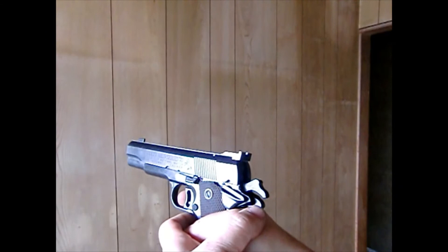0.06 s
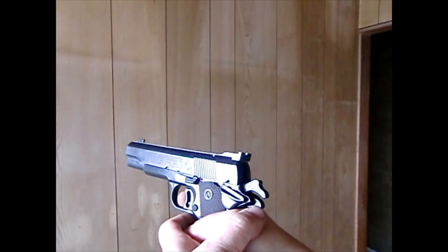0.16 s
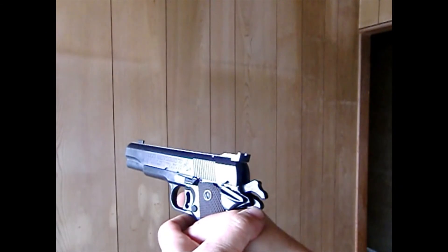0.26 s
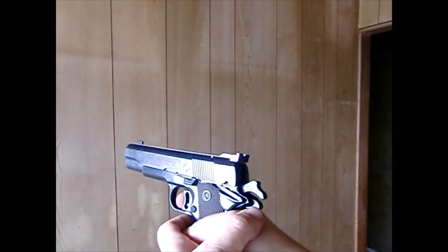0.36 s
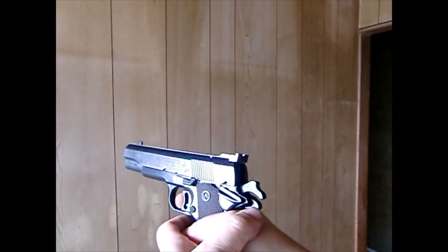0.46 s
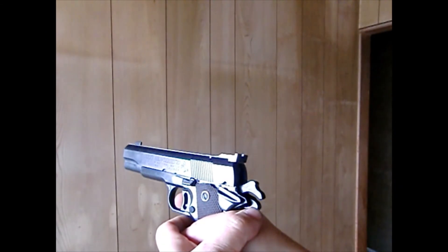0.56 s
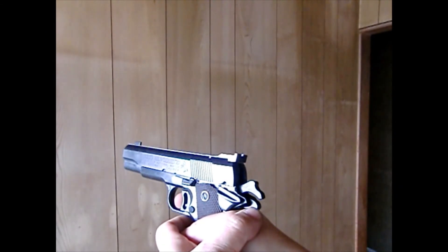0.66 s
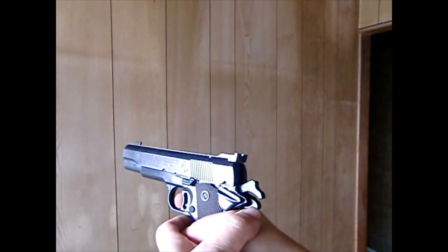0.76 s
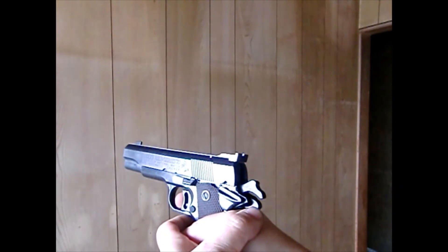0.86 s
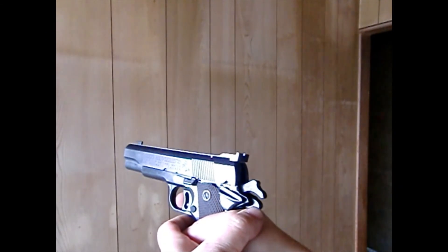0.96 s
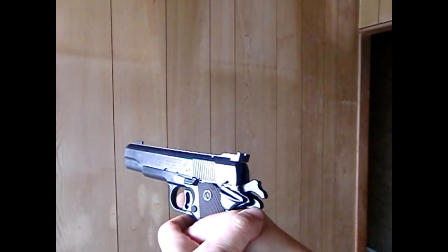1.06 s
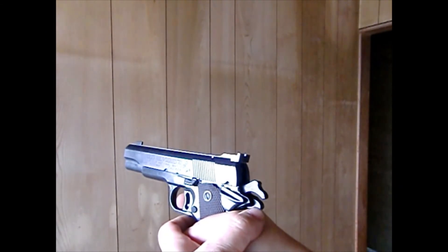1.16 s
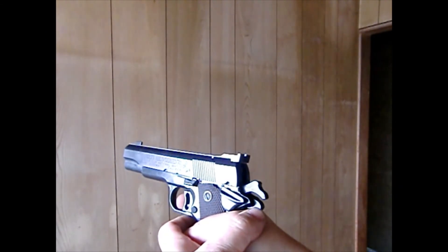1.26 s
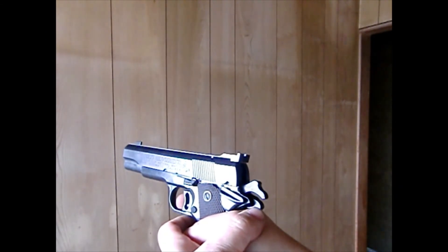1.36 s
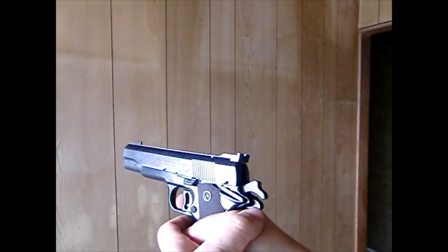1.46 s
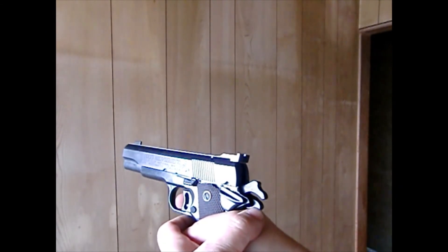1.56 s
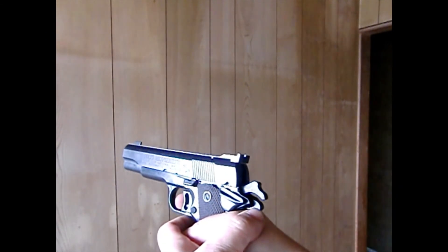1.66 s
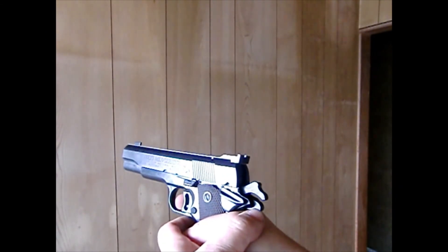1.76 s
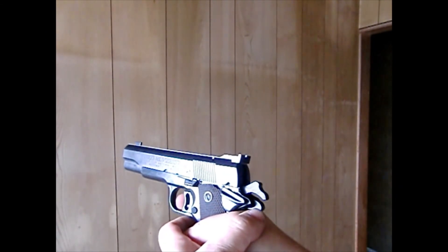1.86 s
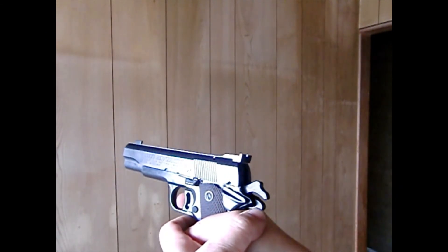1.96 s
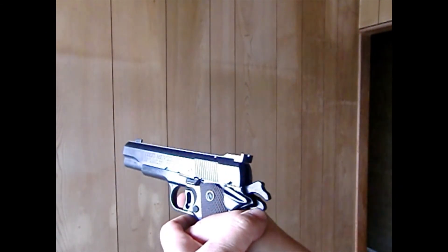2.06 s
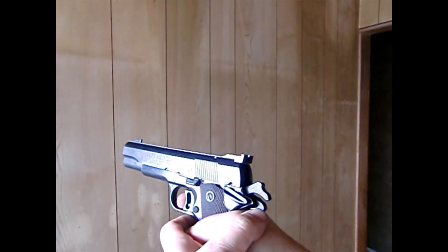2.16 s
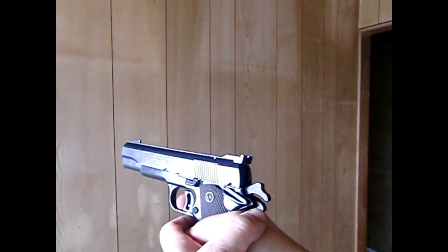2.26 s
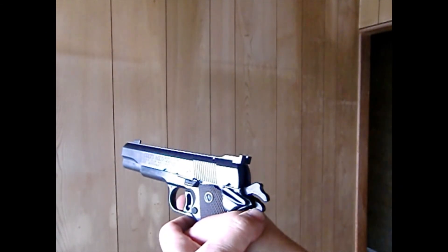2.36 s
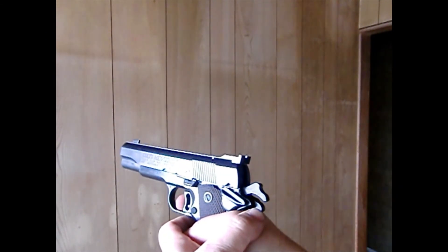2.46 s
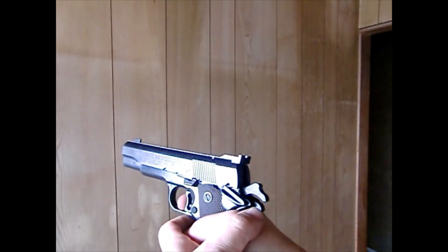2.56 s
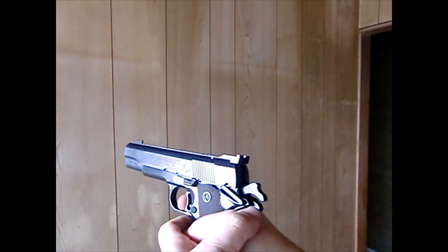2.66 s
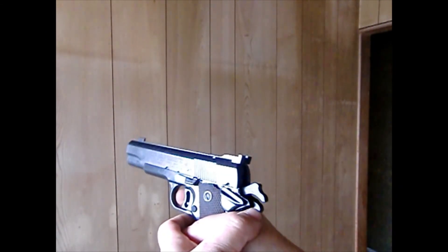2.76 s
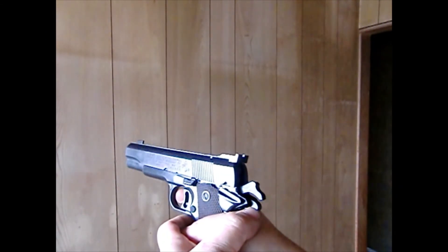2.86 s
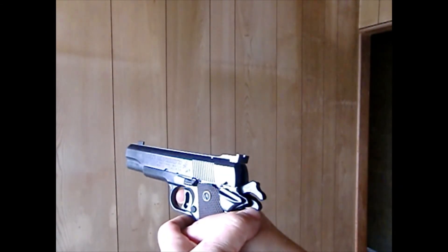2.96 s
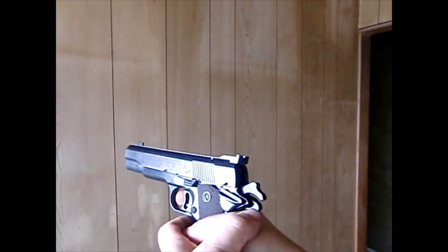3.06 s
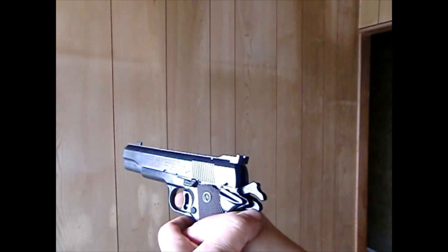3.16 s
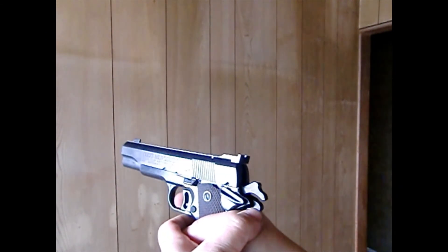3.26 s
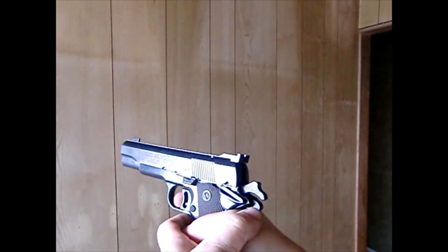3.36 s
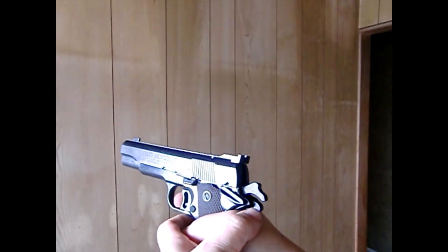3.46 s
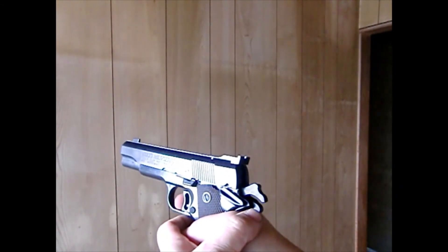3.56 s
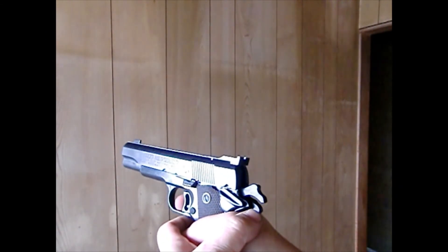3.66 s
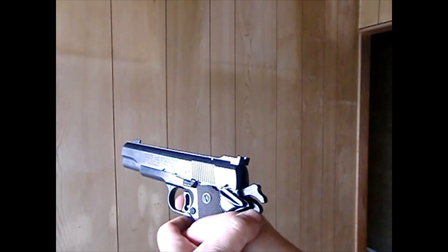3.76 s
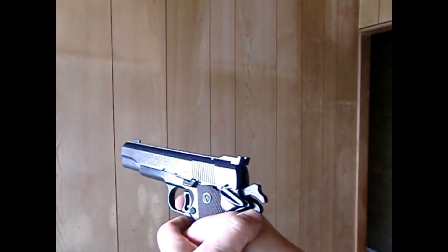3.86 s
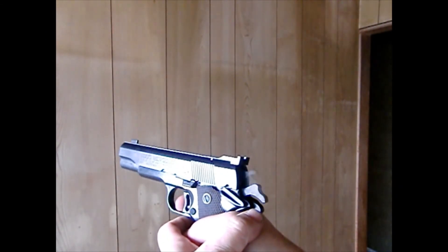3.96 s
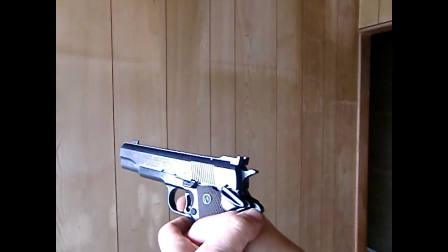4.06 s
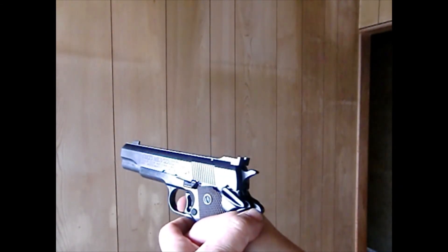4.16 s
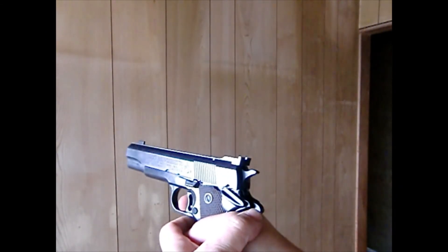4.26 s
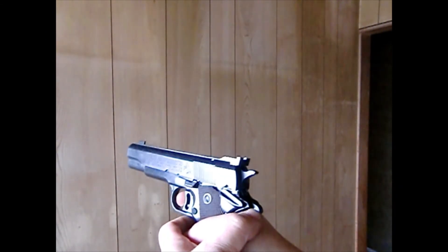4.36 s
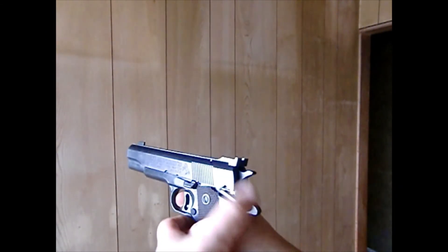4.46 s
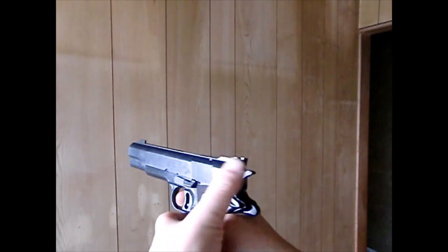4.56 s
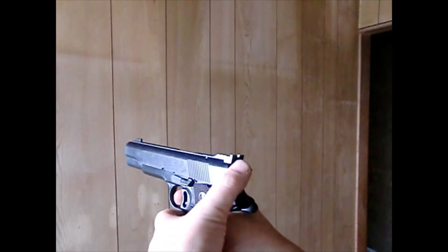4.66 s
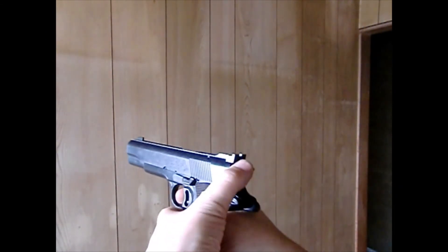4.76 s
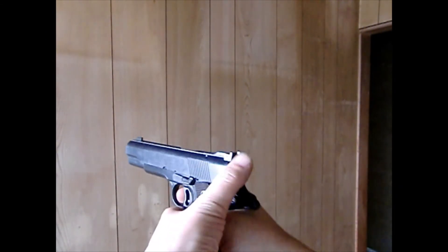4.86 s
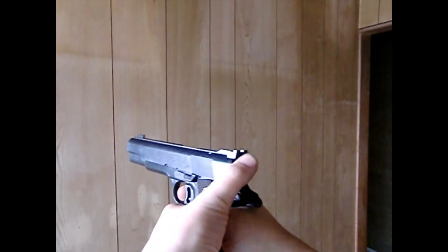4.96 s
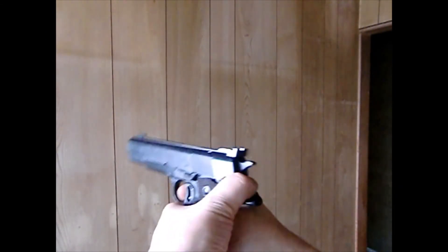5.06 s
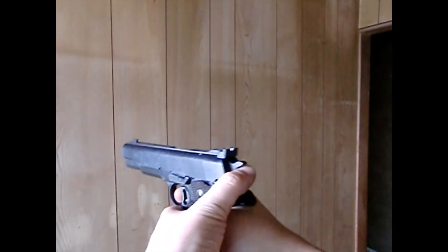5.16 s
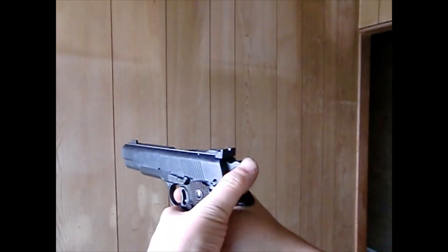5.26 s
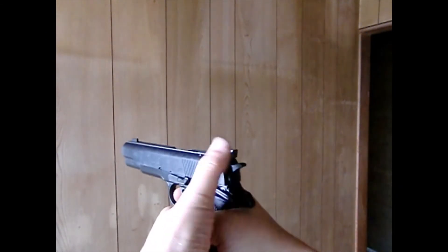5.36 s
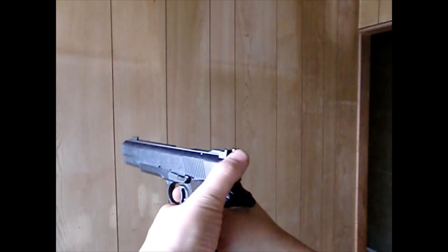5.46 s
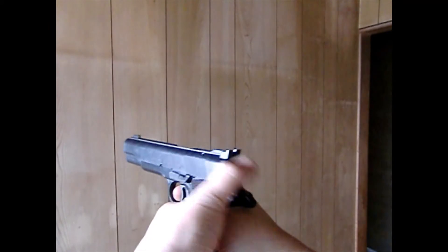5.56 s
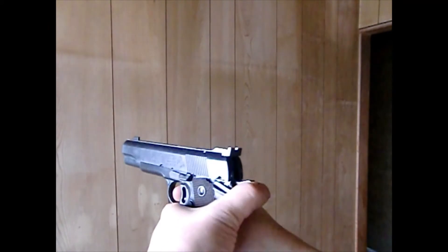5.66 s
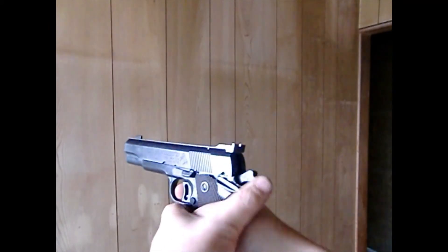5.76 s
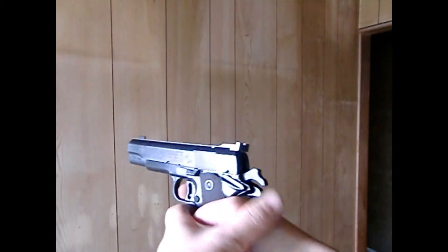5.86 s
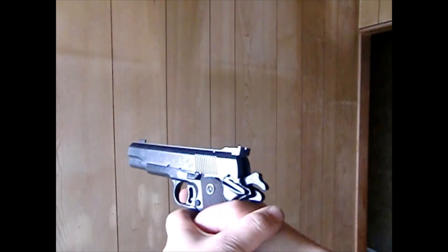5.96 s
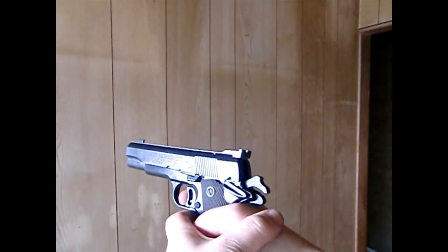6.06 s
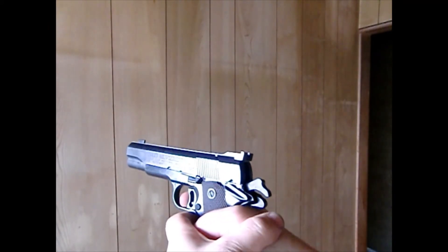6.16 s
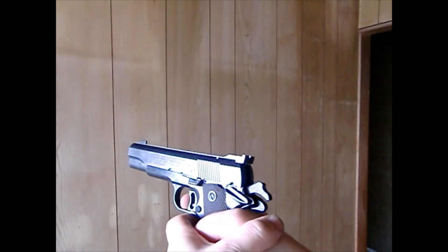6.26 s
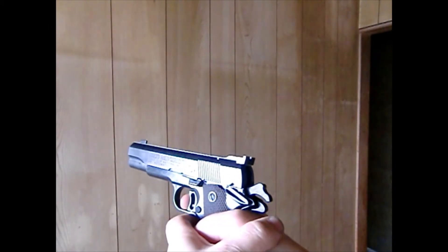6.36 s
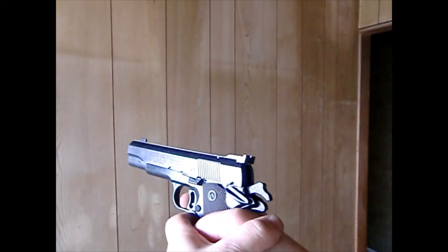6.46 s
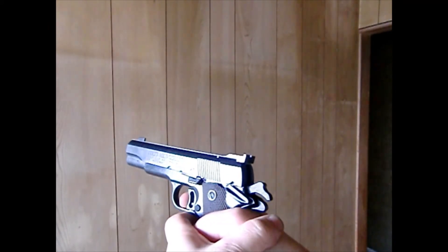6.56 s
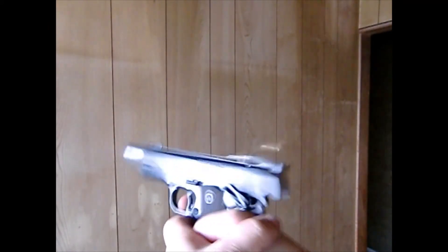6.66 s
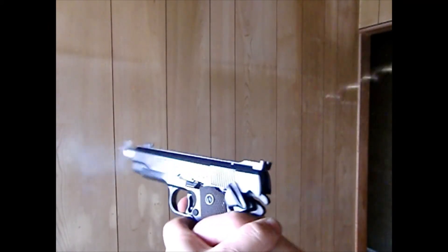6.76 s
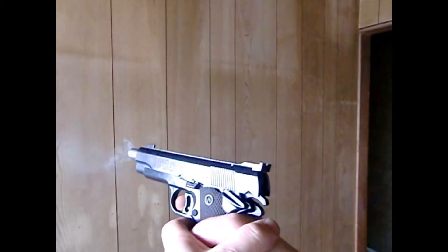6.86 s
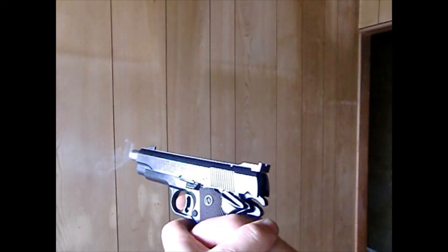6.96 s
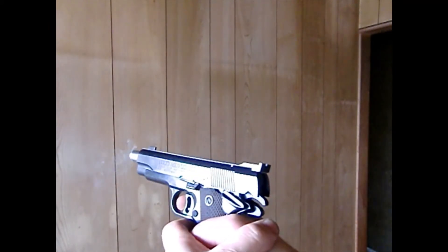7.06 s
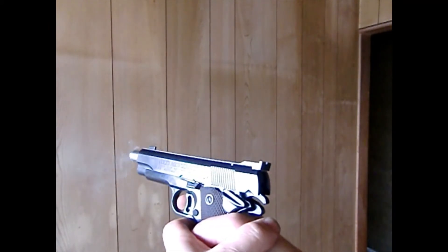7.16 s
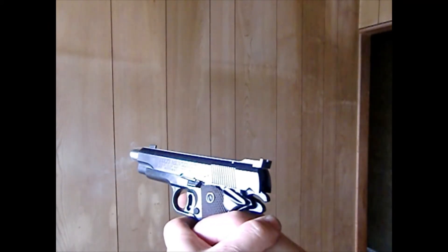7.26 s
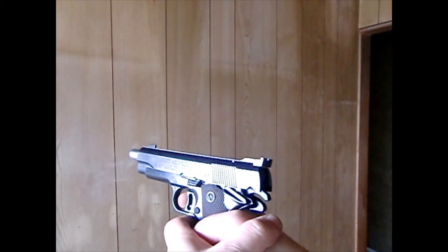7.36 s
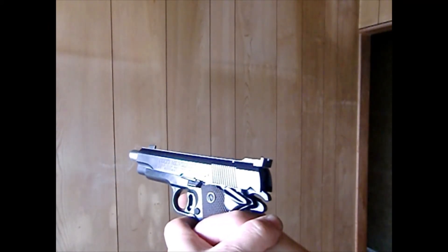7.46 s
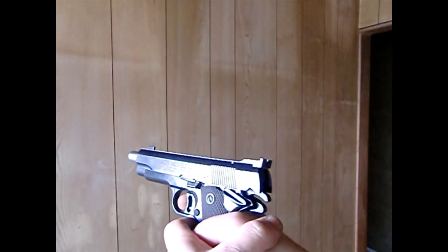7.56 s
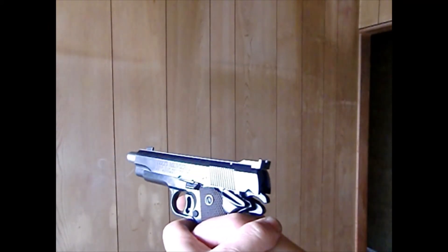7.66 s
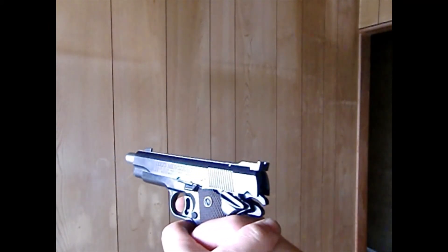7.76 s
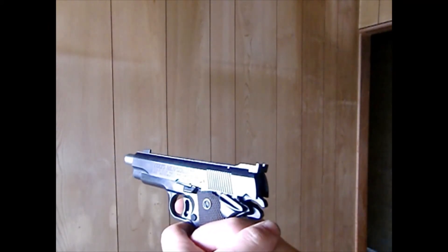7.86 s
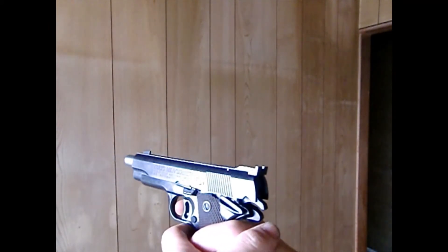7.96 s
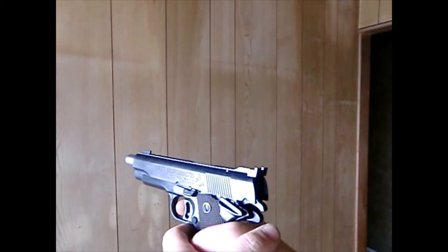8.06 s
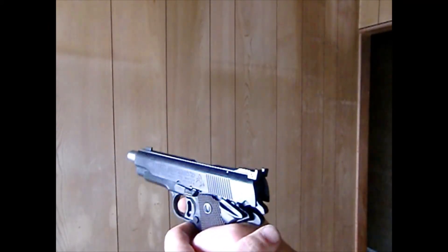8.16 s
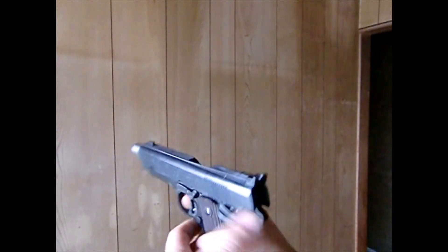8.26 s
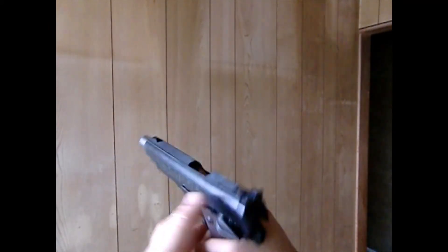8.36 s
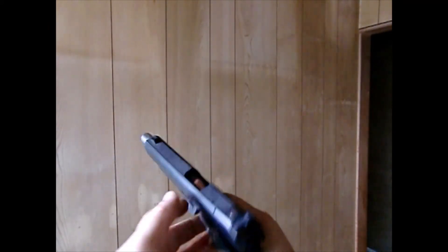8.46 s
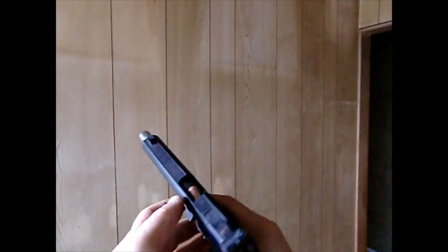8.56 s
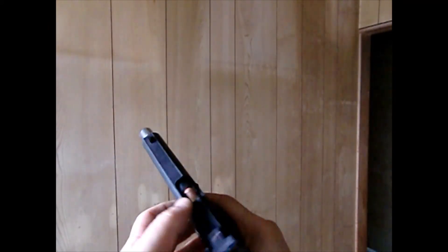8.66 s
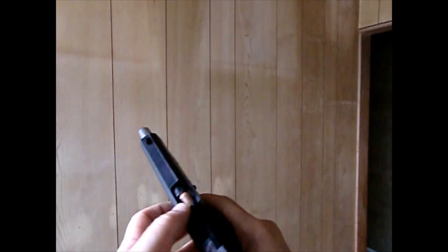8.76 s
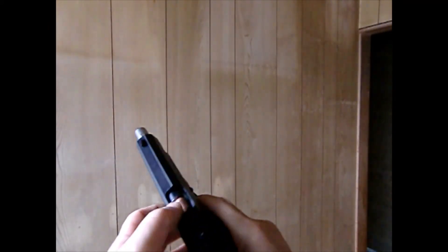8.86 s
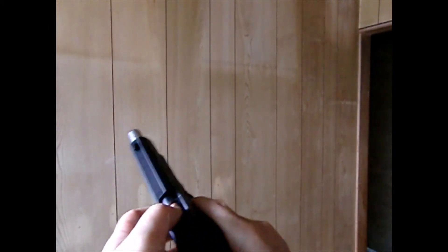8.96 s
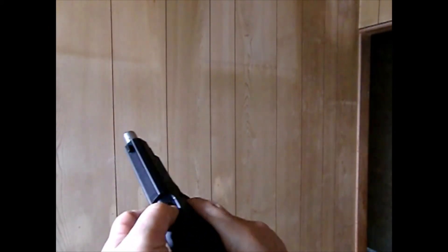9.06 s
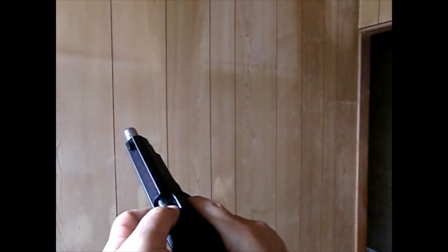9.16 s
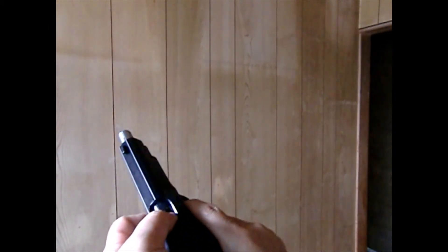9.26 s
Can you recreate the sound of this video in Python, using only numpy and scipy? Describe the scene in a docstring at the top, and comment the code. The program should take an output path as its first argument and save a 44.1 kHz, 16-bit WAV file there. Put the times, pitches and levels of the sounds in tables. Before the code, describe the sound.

Close metal clicks and snaps of a model pistol lead to one ducking, booming cap shot, a wooden knock, rolling and a final clack.

```python
"""In a small wood-panelled room a cap-firing model pistol is handled close to the microphone.
Its catches and hammer click as short contacts in a ringing metal body; a cap fires and the slide flies back.
Hard knocks boom off wood, most likely flung cartridges, and there are stretches of rolling: noise through resonances.
A thin high whine, one gliding sine, wanders over the hiss.
The camera's gain control ducks each loud blow and lets the room swell back."""
import sys
import numpy as np
from scipy import signal
from scipy.fft import rfft, irfft, next_fast_len
from scipy.io import wavfile
from scipy.ndimage import uniform_filter1d

SR = 44100
rng = np.random.default_rng(int(sys.argv[2]) if len(sys.argv) > 2 else 0)


def log_audio(samples):
    """Write samples as a 16-bit WAV file to the path given in sys.argv[1]."""
    # one column per channel
    frames = np.atleast_2d(samples).T
    # limit to full scale, then quantise
    limited = np.clip(frames, -1, 1)
    pcm = np.round(limited * 32767).astype(np.int16)
    wavfile.write(sys.argv[1], SR, pcm)


N = 410571
TIME = np.arange(N) / SR   # s
BURST, TAIL = 4096, 32768   # samples in one blow and in one room tail
BURST_HZ = np.maximum(np.fft.rfftfreq(BURST, 1 / SR), 1)

# radiation of the pistol's action: (frequency [Hz], relative density [dB per Hz])
ACTION_COLOUR = [(290, -55), (500, -14), (638, -13.5), (997, -4), (1240, -10.5), (2230, -7.5), (3960, -4.5),
                 (5430, -11.5), (6740, -14), (11600, -18.5), (15500, -19.5)]
# ringing of frame and slide: (frequency [Hz], width [Hz], lift [dB])
FRAME_MODES = [(994, 150, 7.5), (1332, 93, 6.5), (1762, 76, 7), (2770, 74, 3), (3540, 100, -3.5),
               (7750, 230, 2.5), (10140, 430, 3)]


def from_db(db):
    """Logarithmic level: 20 dB is a factor of ten in amplitude."""
    return 10 ** (np.asarray(db) / 20)


def at_hz(points, hz):
    """Spectral envelope: interpolate levels in dB on a logarithmic frequency axis."""
    points = np.array(points)
    return np.interp(np.log(np.maximum(hz, 1)), np.log(points[:, 0]), points[:, 1])


def unit_energy(x):
    """Signal energy: scale to a sum of squares of one."""
    return x / np.sqrt(np.sum(x ** 2) + 1e-20)


def add(out, start_s, sound):
    """Superposition: mix a sound in at a time."""
    i = max(round(start_s * SR), 0)
    out[i:i + len(sound)] += sound[:max(N - i, 0)]


def resonances(modes, hz):
    """Modal resonance: the lift in dB from a set of peaks."""
    return sum(db / (1 + (2 * (hz - centre) / width) ** 2) for centre, width, db in modes)


def treble(corner_hz):
    """Shelving: a weight from 0 in the bass to 1 in the treble."""
    return 1 - 1 / (1 + (BURST_HZ / corner_hz) ** 4)


def swell(start_s, hold_s, attack_s, release_s):
    """Exponential envelope: grows up to its start, holds at one and dies away."""
    before_s = np.minimum(TIME - start_s, 0)
    after_s = np.maximum(TIME - start_s - hold_s, 0)
    return np.exp(before_s / attack_s - after_s / release_s)


def noise(colour):
    """Spectral shaping: steady noise of rms one, coloured by a function from Hz to dB."""
    size = next_fast_len(N)
    spectrum = rfft(rng.standard_normal(size))
    shaped = irfft(spectrum * from_db(colour(np.fft.rfftfreq(size, 1 / SR))), size)[:N]
    return shaped / shaped.std()


def burst(rise_ms, fall_ms, skirt_db=-13.0, skirt_stretch=2.0):
    """Contact noise: many tiny impacts with a fainter, longer scrape; returns the force and its lead [s]."""
    lead_ms = 5 * rise_ms
    ms = np.arange(BURST) / SR * 1000 - lead_ms
    fade = np.where(ms < 0, ms / rise_ms, -ms / fall_ms)
    envelope = np.exp(fade) + from_db(skirt_db) * np.exp(fade / skirt_stretch)
    spectrum = rfft(rng.standard_normal(BURST) * envelope)
    spectrum /= np.sqrt(uniform_filter1d(abs(spectrum) ** 2, size=160))   # broadly white: the body sets the colour
    return irfft(spectrum)[:BURST * 3 // 4], lead_ms / 1000


def body_ring(colour_db):
    """Minimum phase: an impulse response of this colour that rings only after the blow."""
    cepstrum = irfft(np.log(from_db(colour_db)))
    # fold the cepstrum onto positive time
    cepstrum[1:BURST // 2] *= 2
    cepstrum[BURST // 2 + 1:] = 0
    return unit_energy(irfft(np.exp(rfft(cepstrum))))


def room_tail(build_ms=3.4):
    """Diffuse reverberation: noise bands decay exponentially, the highest treble fastest."""
    # reverberation time: (frequency [Hz], time to fall by 60 dB [s])
    decay_times = np.array([(100, 0.43), (300, 0.32), (800, 0.41), (2000, 0.41), (5000, 0.34), (9000, .28),
                            (15000, 0.24)])
    hz = np.fft.rfftfreq(TAIL, 1 / SR)
    # overlapping triangular bands, one around each frequency
    shares = np.array([np.interp(hz, decay_times[:, 0], band) for band in np.eye(len(decay_times))])
    bands = irfft(rfft(rng.standard_normal(TAIL)) * shares)
    decays = np.exp(-np.log(1000) * TIME[:TAIL] / decay_times[:, 1:])
    build = 1 - np.exp(-(TIME[:TAIL] * 1000 / build_ms) ** 2)
    return unit_energy(np.sum(bands * decays, axis=0) * build)


def blow(colour_db, rise_ms, fall_ms, room_db):
    """Source and room: a blow's direct sound, near reflections and diffuse tail; returns sound and lead [s]."""
    # reflections from camera stand and near walls: (delay [ms], level [dB])
    near_echoes = [(2.6, -10), (5.9, -17.5), (7.3, -15.5), (16.8, -18.5)]
    body = body_ring(colour_db)
    force, lead_s = burst(rise_ms, fall_ms)
    direct = unit_energy(signal.fftconvolve(force, body))
    tail = from_db(room_db) * signal.fftconvolve(room_tail(), body)
    sound = np.pad(tail, (round(lead_s * SR), 0))
    sound[:len(direct)] += direct
    for ms, db in near_echoes:
        add(sound, ms / 1000, from_db(db) * direct)
    return np.sqrt(SR / 100) * sound, lead_s   # 0 dB: direct energy of full scale spread over 10 ms


def rubbing(gain, colour_db, bumps_per_s, room_db):
    """Random impacts: irregular little bumps ring through a body and the room, under an envelope."""
    bumps = (rng.random(N) < bumps_per_s / SR) * rng.standard_normal(N)
    path = from_db(room_db) * room_tail()
    path[0] += 1   # direct sound
    sound = signal.fftconvolve(bumps, signal.fftconvolve(path, body_ring(colour_db)))[:N]
    return sound / sound.std() * gain


def room_air(level_db=-58.5):
    """Background noise: the steady, low-coloured air of the room."""
    # (frequency [Hz], relative density [dB per Hz])
    air_colour = [(15, -42), (25, -9), (116, -6.5), (169, -4.5), (305, -4.5), (399, -7), (445, -5.5),
                  (495, -7), (1300, -11), (1900, -13), (2170, -13), (4380, -17), (15500, -26)]
    return from_db(level_db) * noise(lambda hz: at_hz(air_colour, hz))


def hiss(level_db=-62.5):
    """Electronic noise: steady amplifier hiss, stronger in the bass."""
    # (frequency [Hz], relative density [dB per Hz])
    hiss_colour = [(30, 16), (200, 4.5), (1000, 1), (15000, 1.5)]
    return from_db(level_db) * noise(lambda hz: at_hz(hiss_colour, hz))


def knocks(rise_ms=0.094):
    """Panel resonance: abrupt blows on wood further off, heard mostly through the room."""
    # (time [s], level [dB], fall [ms], room [dB])
    wood_blows = [(0.2793, 2, 2.3, 9), (7.2777, -20, 6.6, 3.5), (7.477, -20, 1.3, 7),
                  (7.866, -24.5, 2.5, 4.5), (8.0228, 0, 0.22, 7.5), (8.066, -11, 1.2, 9),
                  (8.091, -14.5, 1.0, 2.5), (8.143, -18, 1.1, 3)]
    # colour of each struck spot: (frequency [Hz], relative density [dB per Hz])
    spots = [
        [(47, -65.5), (80, -40.5), (205, -16.5), (239, -19.5), (291, -8.5), (347, -9), (482, -2), (562, -11.5),
         (993, -9), (1110, -12.5), (1470, -11.5), (2090, -15), (3100, -16.5), (15000, -33.5)],
        [(35, -57), (60, -25), (174, -12), (257, -9.5), (372, -24.5), (418, -10.5), (514, -11.5), (619, -9),
         (711, -9), (1490, -9.5), (1920, -16), (4210, -21.5), (15000, -37)],
        [(35, -63.5), (60, -26), (91, -10), (144, -23), (209, -8), (480, -1), (526, -9.5), (780, -6),
         (1390, -13), (1560, -8), (2530, -7), (8230, -26), (15000, -32.5)],
        [(35, -70), (60, -34), (97, -17.5), (135, -22), (224, -9), (381, -11.5), (539, -3), (835, -22.5),
         (1050, -26), (1330, -28), (1600, -25.5), (2110, -30.5), (3930, -30.5), (15000, -44.5)],
        [(41, -78), (70, -39.5), (225, -15), (263, -7), (345, -8), (395, 3), (505, -3.5), (553, -5),
         (809, -1.5), (926, -10), (1010, -3.5), (1130, -5.5), (3110, -12.5), (15000, -40)],
    ]
    # (frequency [Hz], width [Hz], lift [dB])
    panel_modes = [(390.7, 28, 2.5), (585.4, 20, 5), (797, 10, 7), (1025, 72, 2.5)]
    out = np.zeros(N)
    for k, (s, db, fall_ms, room_db) in enumerate(wood_blows):
        spot = spots[min(k, len(spots) - 1)]   # the last blows are bounces on the same spot
        colour = at_hz(spot, BURST_HZ) + resonances(panel_modes, BURST_HZ)
        sound, lead_s = blow(colour, rise_ms, fall_ms, room_db)
        add(out, s - lead_s, from_db(db) * sound)
    return out


def rolling(attack_s=0.04, release_s=0.078):
    """Rolling contact: the rim of a cartridge bumps irregularly over the floor."""
    # stretches: (time [s], hold [s], level [dB])
    rolls = [(0.675, .13, -50), (8.33, 0.25, -38.5), (8.752, 0.26, -59.5)]
    # (frequency [Hz], relative density [dB per Hz])
    roll_colour = [(71, -61), (120, -27.5), (294, -4), (357, -13.5), (440, -0.5), (525, -11), (553, -7.5),
                   (604, -14), (1080, -12.5), (8000, -41.5), (10400, -77), (17600, -120)]
    # attack: gathering speed; release: running out
    gain = sum(from_db(db) * swell(s, hold_s, attack_s, release_s) for s, hold_s, db in rolls)
    return rubbing(gain, at_hz(roll_colour, BURST_HZ), bumps_per_s=170, room_db=7.5)


def action(rise_share=0.6, bass_hz=620, bright_hz=6500, ring_hz=1500, part_width_share=0.34):
    """Small radiator: catches, trigger, hammer and slide scrape briefly in a body that radiates little bass."""
    # contacts: (time [s], level [dB], fall [ms], brightness [dB], struck part)
    contacts = [(1.6211, -29, 0.29, 5.5, "trigger"), (2.098, -48, 5.3, -20, "spring"),
                (2.2537, -27.5, 1.94, 4, "spring"), (2.4787, -32.5, 0.95, -3, "hammer"),
                (2.5066, -33, 0.26, -0.5, "hammer"), (2.545, -42.5, 0.67, 7, "trigger"),
                (2.693, -40.5, 0.53, -3, "catch"), (2.7073, -32.5, 2.4, -8, "slide"),
                (2.7236, -11, 0.82, 15, "slide"), (2.8147, -34.5, 0.83, 4, "frame"),
                (2.866, -34.5, 0.61, 8, "trigger"), (3.1957, -42, 1.96, -7, "spring"),
                (3.53, -27.5, 2.48, -1, "hammer"), (3.8778, -30.5, 0.61, 4, "trigger"),
                (3.9296, -4, 0.77, 6, "hammer"), (3.933, 10.5, 1.7, 9, "hammer"),
                (4.18, -36.5, 1.25, -8, "frame"), (4.1994, -43.5, 1.3, 0, "spring"),
                (4.2545, -14, 1.03, 5.5, "spring"), (4.9485, -46, 2, 1, "hammer"),
                (4.9711, -35, 0.63, -2, "sear"), (4.9864, -22, 2.08, -13.5, "sear"),
                (5.445, -47.5, 0.51, -4, "trigger"), (5.4885, -26, 0.423, 2, "frame"),
                (5.521, -3.5, .6, 12, "catch"), (5.5619, -7.5, .5, 16, "spring"),
                (5.5703, -15, .4, -6, "pin"), (5.6831, -21, 1.16, 7.5, "trigger"),
                (5.9159, -42, 2.2, 11, "spring"), (6.108, -32.5, 1.63, -1, "spring"),
                (6.5223, -31.5, 0.52, 6, "trigger"), (6.5517, -41, .7, 1, "hammer"),
                (7.1147, -37, 0.48, -6.5, "frame"), (8.715, -46.5, 1.16, -7, "slide"),
                (8.9945, -44, 0.51, -9, "catch"), (9.13, -35, 1.1, -24, "frame"),
                (9.148, -4.5, 2.87, 3, "hammer"), (9.2914, -26.5, 0.92, 1.5, "catch")]
    # what each struck part adds: (own pitch [Hz], own ring [dB], frame ring [dB])
    parts = {"trigger": (3700, 6.5, 13), "hammer": (1670, 6, -10.5), "sear": (1480, 12.4, -5),
             "slide": (2880, 12.8, -1.5), "spring": (3270, 2.5, -7), "catch": (2060, 13.4, -6.5),
             "frame": (1900, 1.1, 9.6), "pin": (7700, 20, -1)}
    bass_db, room_db = -13.5, -11
    out = np.zeros(N)
    body = at_hz(ACTION_COLOUR[1:], BURST_HZ) + resonances(FRAME_MODES, BURST_HZ)
    body = body + bass_db * (1 - treble(bass_hz))
    frame_band = treble(bass_hz) * (1 - treble(ring_hz))
    for s, db, fall_ms, bright_db, name in contacts:
        part_hz, part_db, ring_db = parts[name]
        part = resonances([(part_hz, part_width_share * part_hz, part_db)], BURST_HZ)
        colour = body + part + ring_db * frame_band + bright_db * treble(bright_hz)
        sound, lead_s = blow(colour, rise_share * fall_ms, fall_ms, room_db)
        add(out, s - lead_s, from_db(db) * sound)
    return out


def whine(flicker_db=5.0, waver_hz=35, sag_hz=850):
    """Frequency modulation: a faint, very high sine glides in arcs, loudest near each top; it flickers and wavers."""
    # arcs: (time of the top [s], length [s], top pitch before smoothing [Hz], level [dB])
    arcs = [(1.755, 0.11, 11150, -67), (5.027, .075, 12500, -53), (5.155, .13, 12900, -48),
            (5.252, .11, 12200, -55), (5.365, 0.077, 11640, -59), (5.465, .1, 10950, -66),
            (8.58, .08, 12000, -57), (8.685, 0.14, 13560, -60), (8.81, 0.18, 12100, -62),
            (8.925, .14, 11760, -61), (9.092, .15, 10540, -68)]
    pitch, gain = np.zeros(N), np.zeros(N)
    for s, length_s, top_hz, db in arcs:
        away = (2 * (TIME - s) / length_s) ** 2   # 0 at the top, 1 at either end
        pitch = np.maximum(pitch, top_hz - sag_hz * away)
        gain += from_db(db) * np.exp(-np.minimum(away, 20))
    # slow noises
    flicker, waver = (noise(lambda hz: -120 * np.minimum(hz / 200, 1)) for _ in range(2))
    pitch = uniform_filter1d(pitch, size=800) + waver_hz * waver
    tone = np.sqrt(2) * np.sin(2 * np.pi * np.cumsum(pitch) / SR)
    return gain * from_db(flicker_db * flicker) * tone


def thumb(soft_db=-11.0, hold_s=0.009, attack_s=0.011, release_s=0.018):
    """Friction: skin slips on the hammer and softly stirs the frame."""
    # (time [s], level [dB])
    slips = [(5.19, -54), (5.27, -55), (5.35, -55)]
    colour = at_hz(ACTION_COLOUR, BURST_HZ) + resonances(FRAME_MODES, BURST_HZ)
    colour = colour + soft_db * treble(corner_hz=2450)
    gain = sum(from_db(db) * swell(s, hold_s, attack_s, release_s) for s, db in slips)
    return rubbing(gain, colour, bumps_per_s=600, room_db=-4.5)


def shot(bright_hz=6000):
    """Impulsive source: the cap cracks, gas vents and the slide slams back, filling the room."""
    # cap bursting, gas venting, case flung out, slide hitting its stop:
    # (time [s], level [dB], rise [ms], fall [ms], brightness [dB], room [dB])
    stages = [(6.61, 8, 1.09, 4.8, 8, -3.5), (6.616, 4, 3.0, 9.5, 3, -2), (6.657, 2, 3.6, 5.1, 4, -0.5),
              (6.666, 15, 2.0, 5.7, -0.5, 4)]
    # (frequency [Hz], relative density [dB per Hz])
    blast_colour = [(71, -57.5), (120, -32.5), (271, -15.5), (346, -15), (450, -5), (676, -9), (863, -2),
                    (1170, -4.5), (2540, 0), (15500, -17)]
    out = np.zeros(N)
    for s, db, rise_ms, fall_ms, bright_db, room_db in stages:
        colour = at_hz(blast_colour, BURST_HZ) + bright_db * treble(bright_hz)
        sound, lead_s = blow(colour, rise_ms, fall_ms, room_db)
        add(out, s - lead_s, from_db(db) * sound)
    return out


def scene():
    """Superposition: the room's air, knocks, rolling, pistol and whine as one channel."""
    return (room_air() + knocks() + rolling() + action() + whine() + thumb() + shot())[None]


def record(dry, limit_db=-7, release_db_per_s=68.5, lopsided=0.16, cutoff_hz=15900):
    """Automatic gain control: ducks at once, recovers steadily; then hiss, rounded peaks and band limits."""
    power = uniform_filter1d(dry[0] ** 2, size=66)
    level_db = 10 * np.log10(np.maximum(power, 1e-12))
    recovery = release_db_per_s * TIME
    # the running maximum holds each duck; the ramp lets it fall steadily
    duck_db = np.maximum.accumulate(np.maximum(level_db - limit_db, 0) + recovery) - recovery
    out = dry * from_db(-uniform_filter1d(duck_db, size=24)) + hiss()
    out = out / (1 + (out / 0.9) ** 8) ** (1 / 8)   # peaks round off below 0.9
    out = out - lopsided * np.square(out ** 2)   # one-sided overload adds a low thump
    out = signal.sosfilt(signal.butter(1, 30, "high", fs=SR, output="sos"), out)
    return signal.sosfilt(signal.ellip(10, 0.2, 75, cutoff_hz, fs=SR, output="sos"), out)


dry = scene()
out = record(dry)
log_audio(out)
```